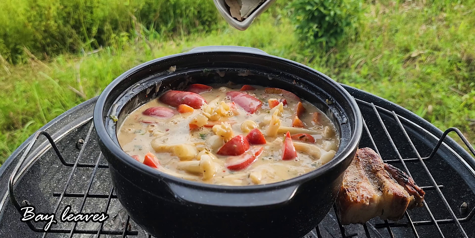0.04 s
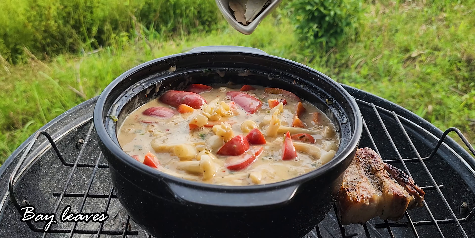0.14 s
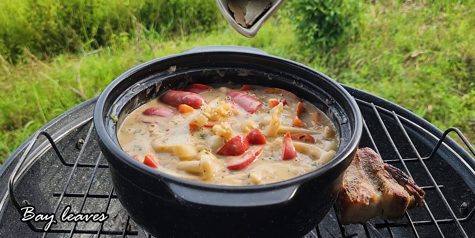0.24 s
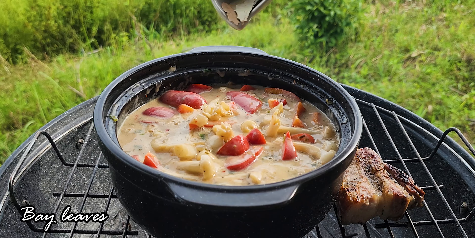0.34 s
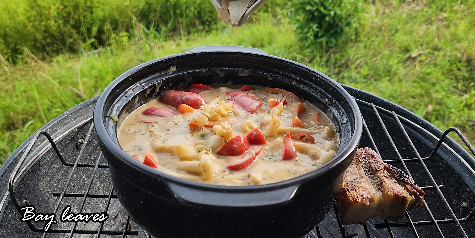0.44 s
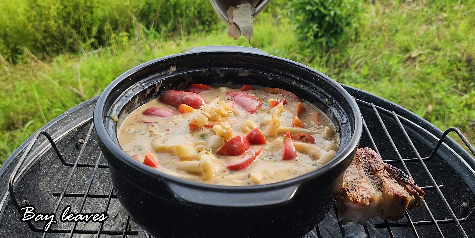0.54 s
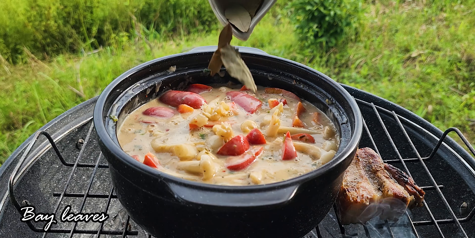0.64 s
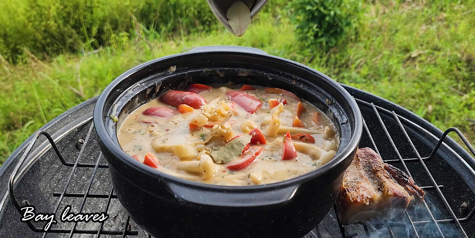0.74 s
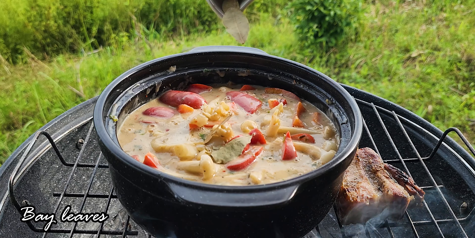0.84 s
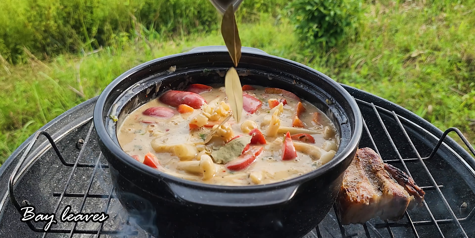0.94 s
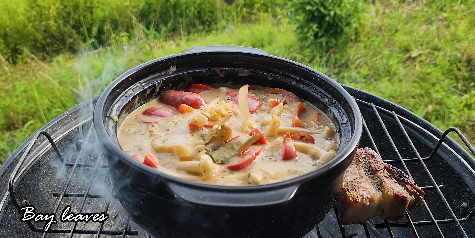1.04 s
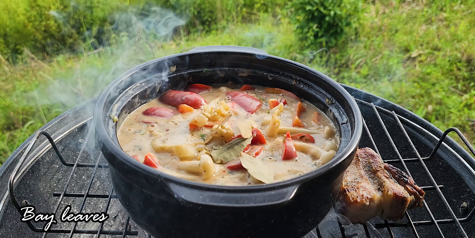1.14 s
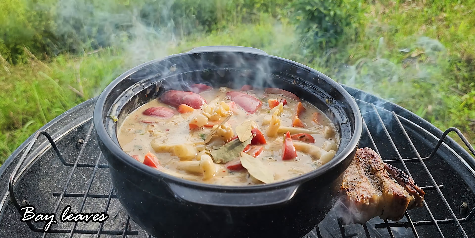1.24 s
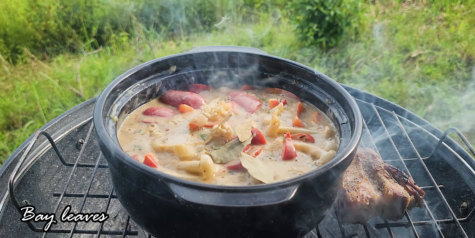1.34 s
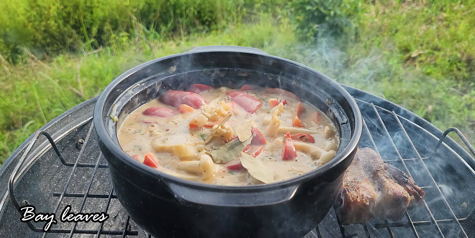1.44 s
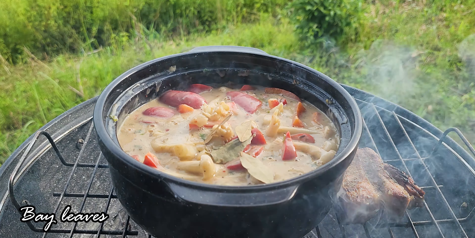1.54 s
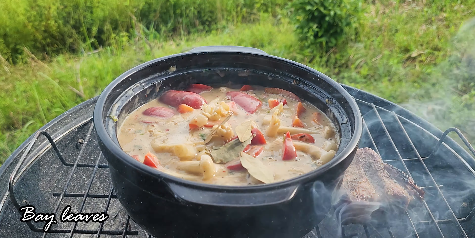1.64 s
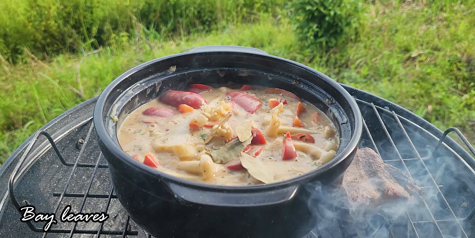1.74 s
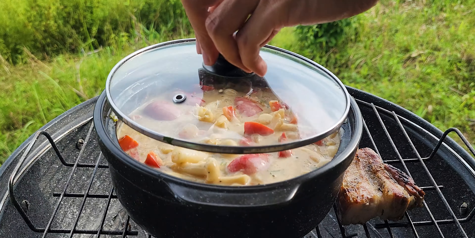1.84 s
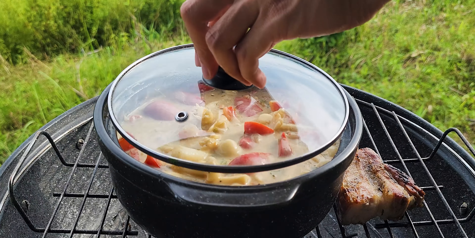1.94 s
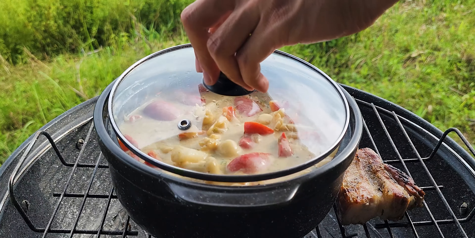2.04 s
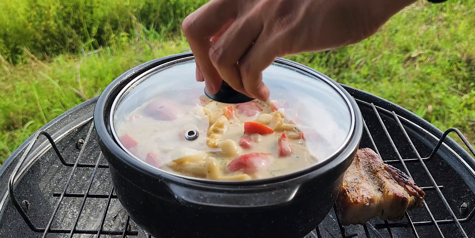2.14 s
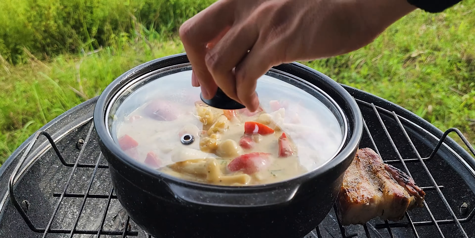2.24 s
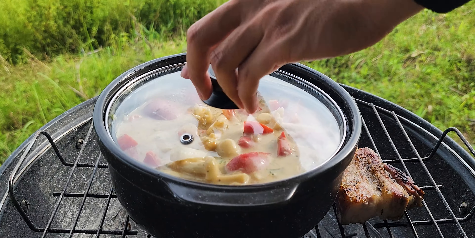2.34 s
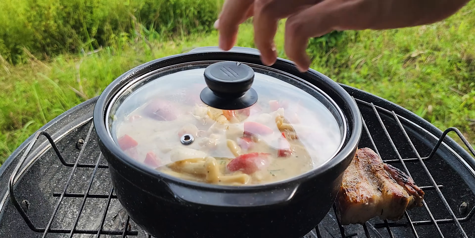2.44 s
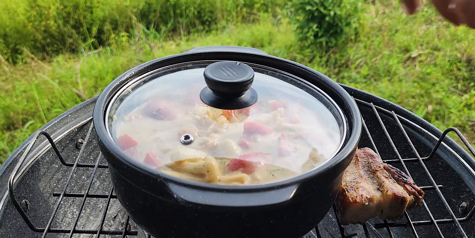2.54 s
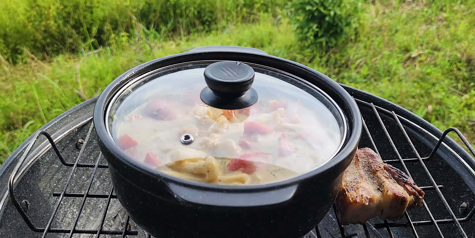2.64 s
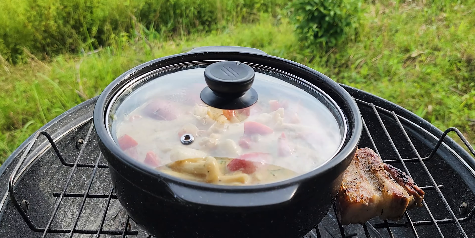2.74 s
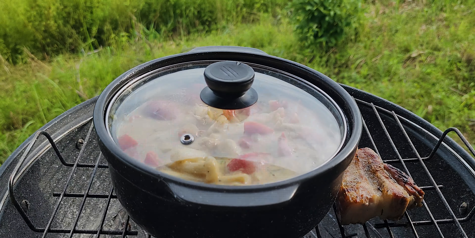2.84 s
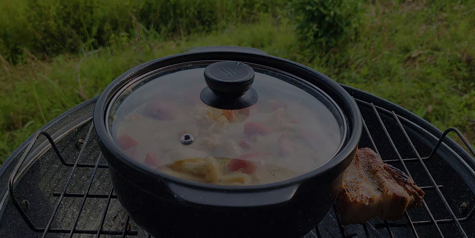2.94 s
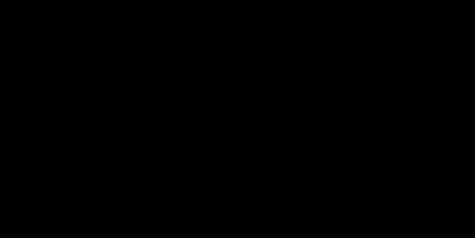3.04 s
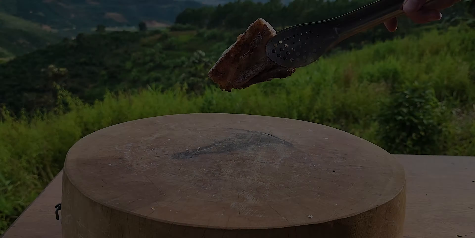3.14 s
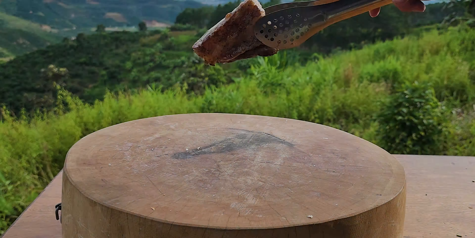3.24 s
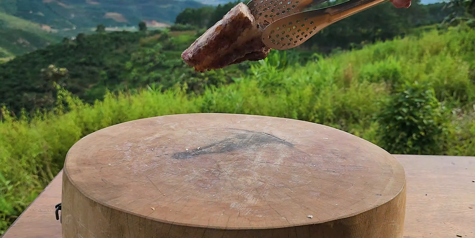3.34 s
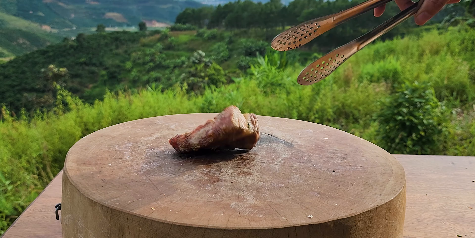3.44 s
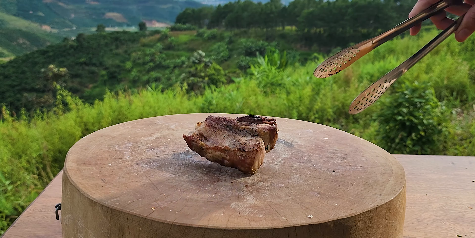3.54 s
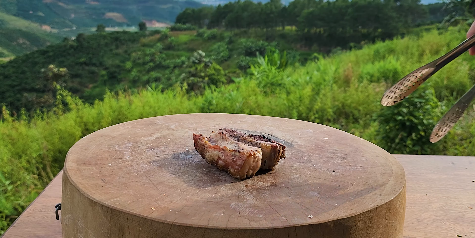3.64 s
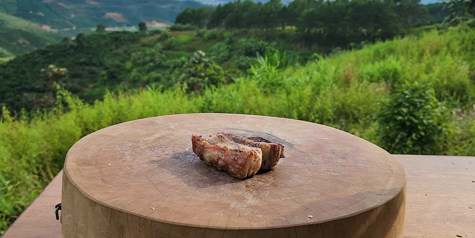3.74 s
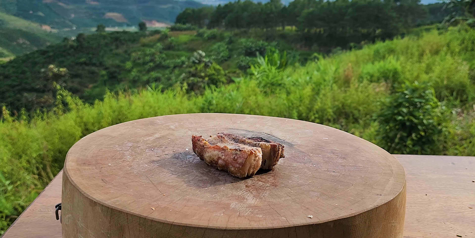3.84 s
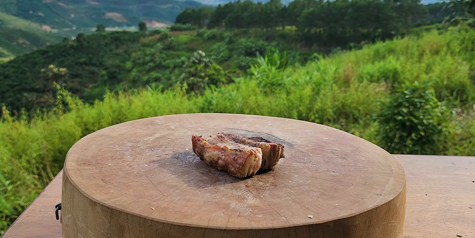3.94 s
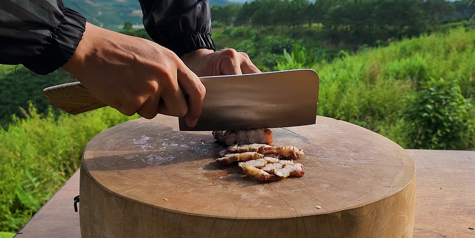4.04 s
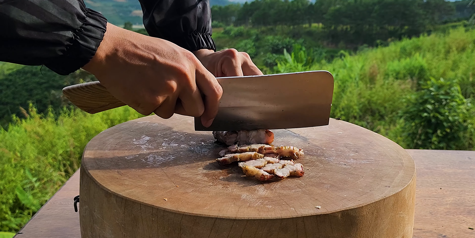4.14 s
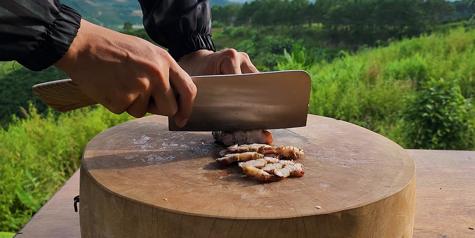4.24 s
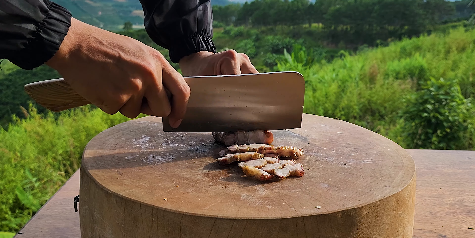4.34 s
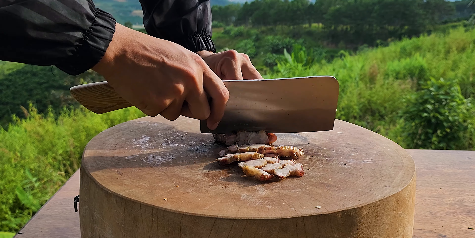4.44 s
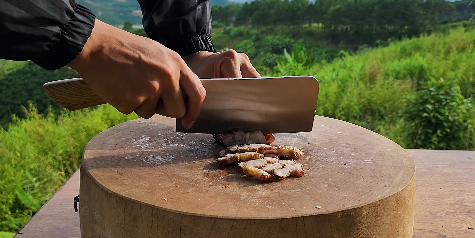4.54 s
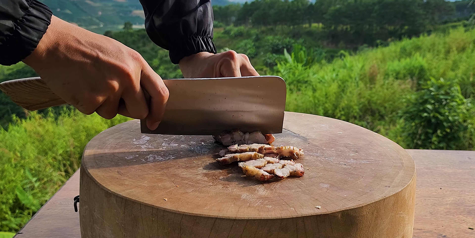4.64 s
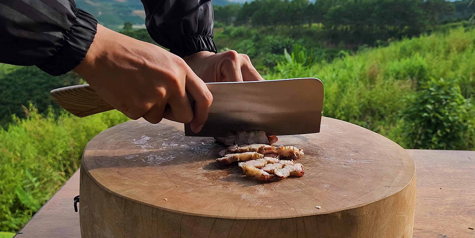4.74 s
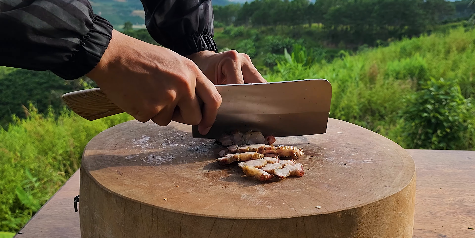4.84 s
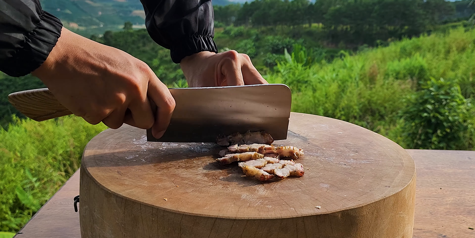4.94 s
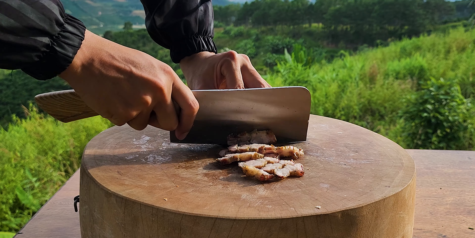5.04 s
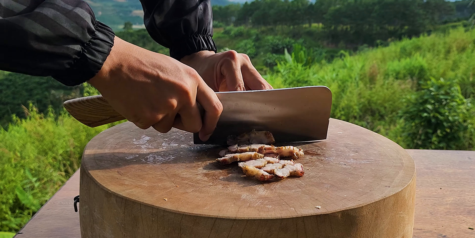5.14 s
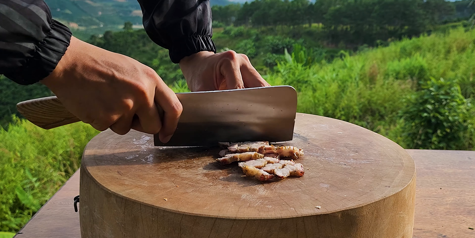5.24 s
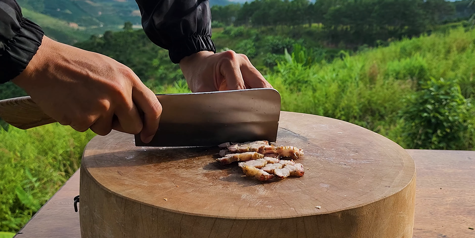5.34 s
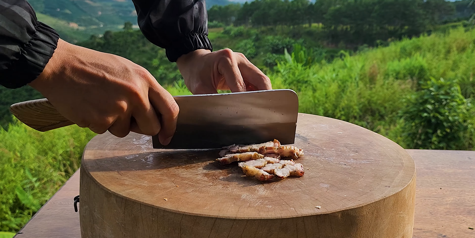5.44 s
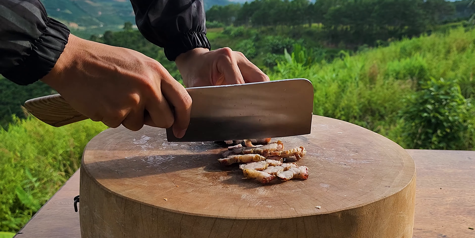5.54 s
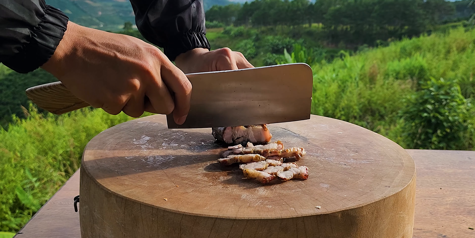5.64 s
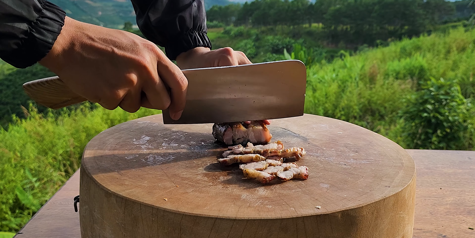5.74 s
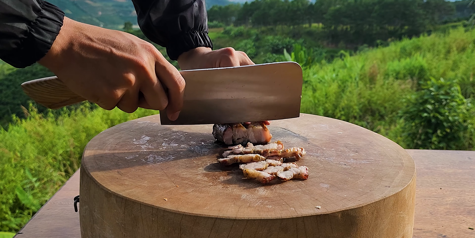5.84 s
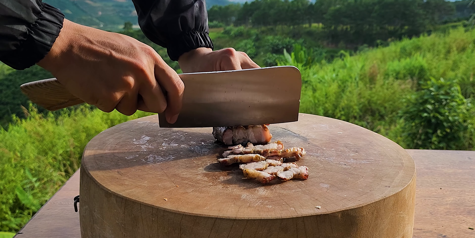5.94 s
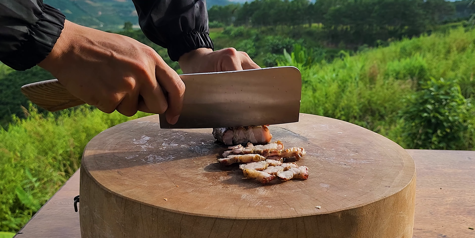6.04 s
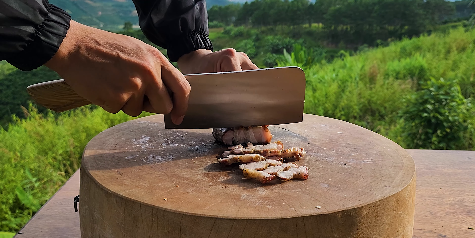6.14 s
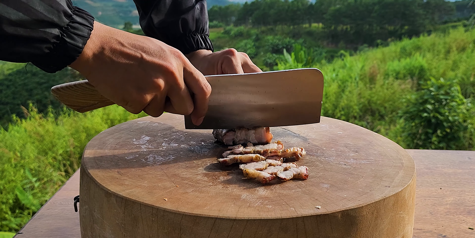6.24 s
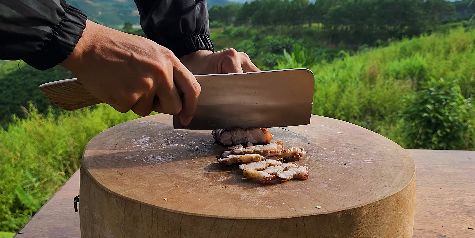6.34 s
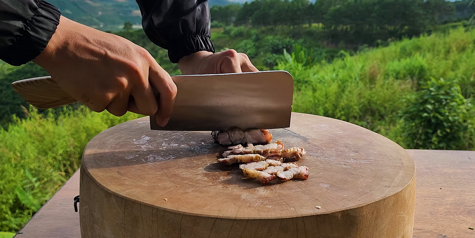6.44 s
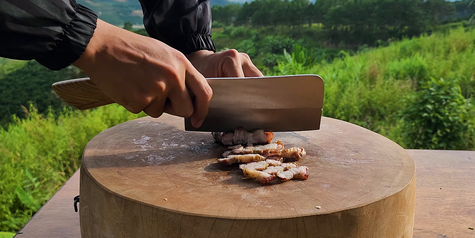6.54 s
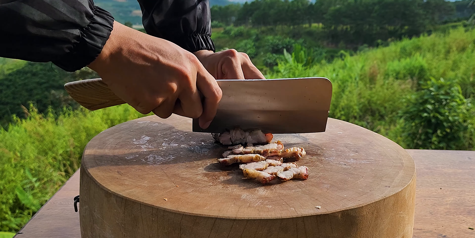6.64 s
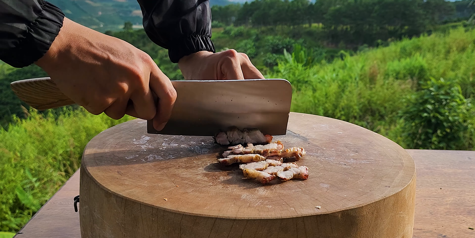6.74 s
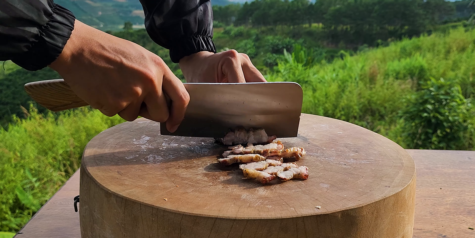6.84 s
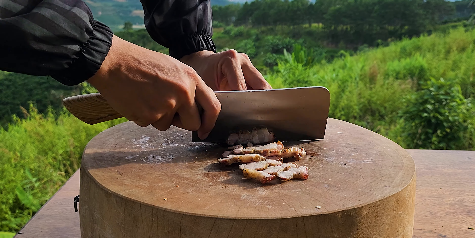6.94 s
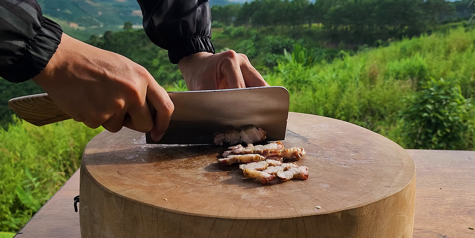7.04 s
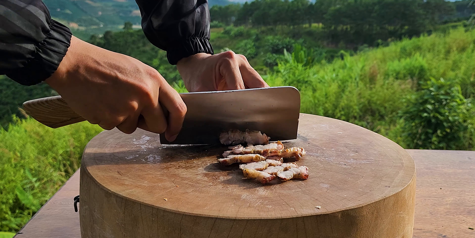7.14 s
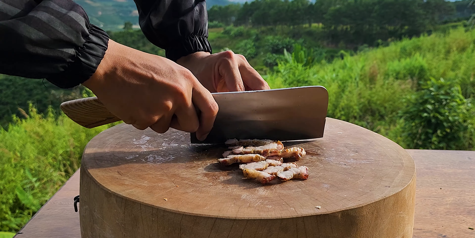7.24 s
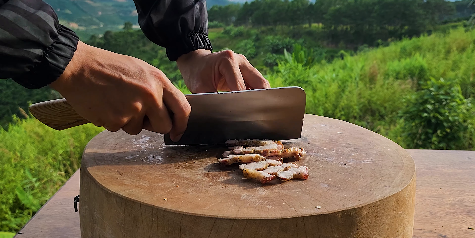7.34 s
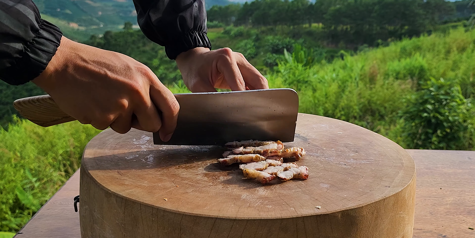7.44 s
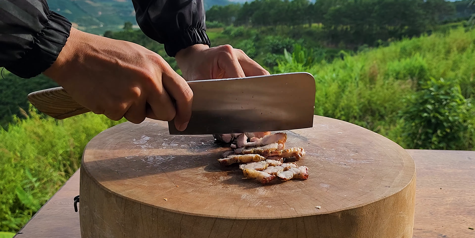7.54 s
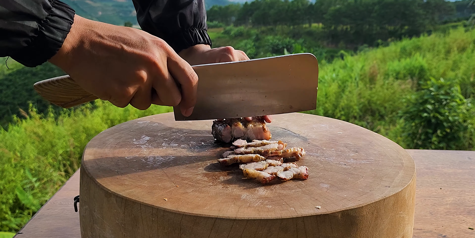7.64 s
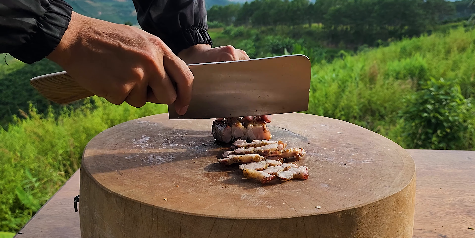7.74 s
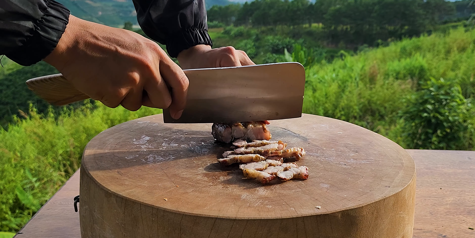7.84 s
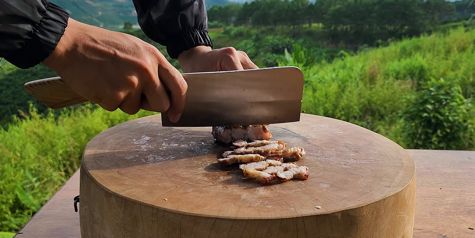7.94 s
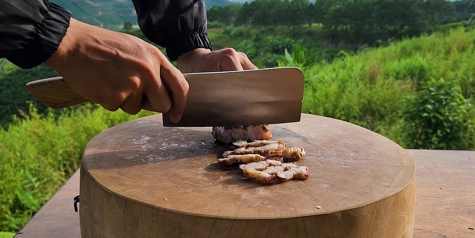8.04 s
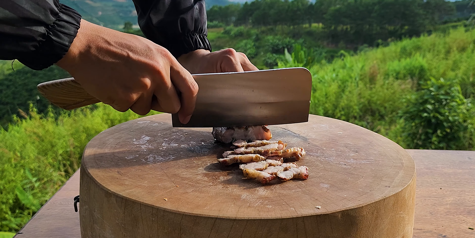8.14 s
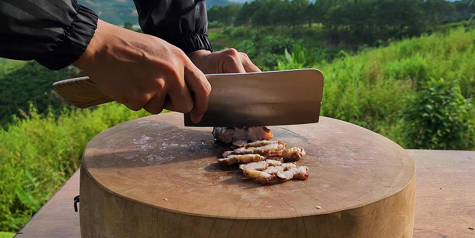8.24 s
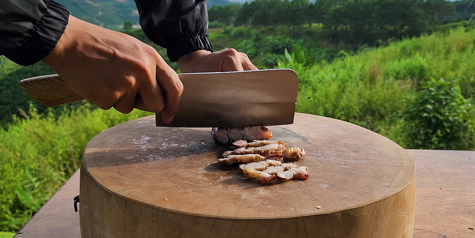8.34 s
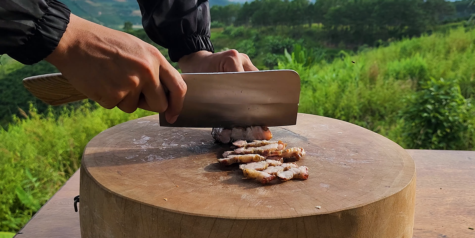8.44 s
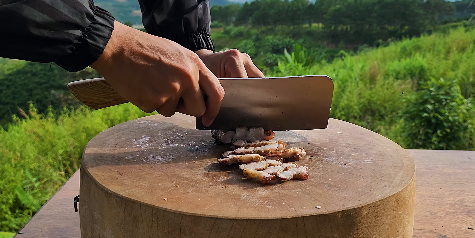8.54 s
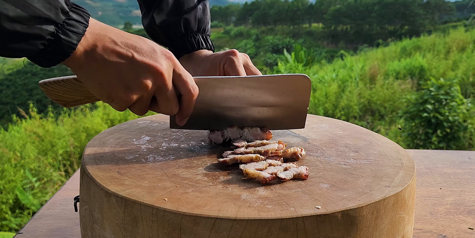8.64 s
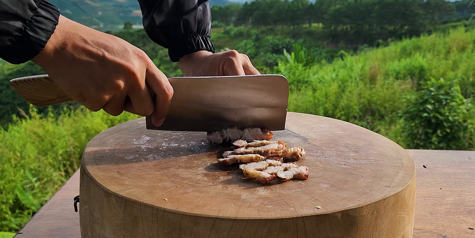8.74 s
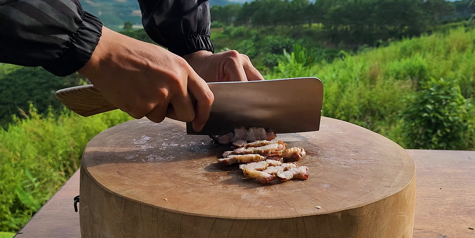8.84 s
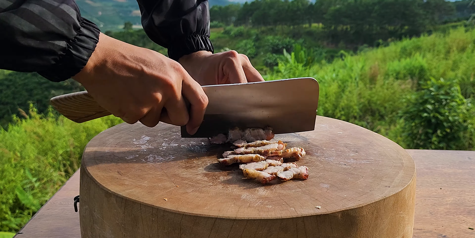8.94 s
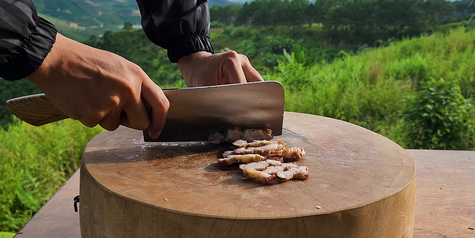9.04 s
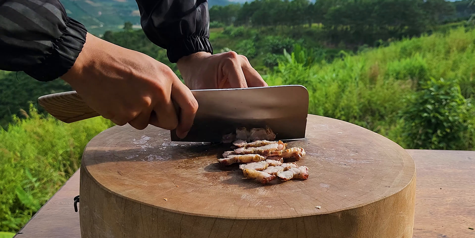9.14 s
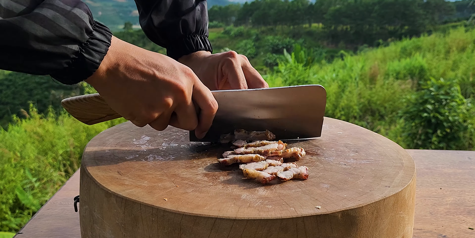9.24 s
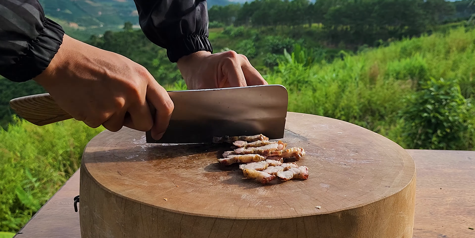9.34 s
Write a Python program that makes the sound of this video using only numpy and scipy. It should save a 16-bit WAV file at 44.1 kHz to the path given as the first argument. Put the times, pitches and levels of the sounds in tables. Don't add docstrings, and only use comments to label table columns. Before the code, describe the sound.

Stereo microphones sit close to cooking in the open air, with low wind gusts, a far engine hum and thin crickets beneath. Spitting fat grows until a bright glass and metal lid clink, then thins out. Soft meat thumps follow, then rasping cleaver strokes with sharp wooden knocks, while distant birds whistle on the right. Finally sizzling swells again and two or three blows land.

```python
import sys
import numpy as np
from scipy import signal
from scipy.fft import rfft, irfft, next_fast_len
from scipy.io import wavfile
from scipy.ndimage import uniform_filter1d, map_coordinates

SR = 44100
rng = np.random.default_rng(int(sys.argv[2]) if len(sys.argv) > 2 else 0)


def generate_wav(sig):
    pcm = np.round(np.clip(np.atleast_2d(sig).T, -1, 1) * 32767).astype(np.int16)
    wavfile.write(sys.argv[1], SR, pcm)


def rack_gain(trim_db):
    fader = np.asarray(trim_db, float)
    return 10 ** (fader / 20)


N = 414099

# time [s], level [dB].
FRYING_LEVEL = [(0, -59.5), (.4, -61.5), (.75, -54.5), (1.23, -49.5), (2.12, -43.5), (2.9, -49.5),
                (3.48, -58), (3.68, -58), (3.8, -67), (4.3, -67.5), (7.3, -86), (7.6, -61), (8.11, -48.5),
                (8.5, -46.5), (9.1, -40.5), (9.25, -41.5), (9.39, -39.5)]
# frequency [Hz], density [dB per Hz].
FRYING_SPECTRUM = [(180, -6.5), (300, -5.5), (546, -5.5), (725, -5.5), (978, -5.5), (1360, -6), (4300, 0.5),
                   (7690, -3.5), (12900, -15), (15200, -23.5), (16000, -25)]
# frequency [Hz], correlation [0 to 1].
FRYING_LIKENESS = [(300, 1), (4000, 0.99), (12000, 0.94)]
# centre [s], half length [s], change [dB].
FRYING_SURGES = [(.68, 0.022, -0.5), (0.904, .025, 5), (0.963, 0.037, -4), (1.027, 0.014, 3),
                 (1.075, .02, 3), (1.162, 0.019, 1.5), (1.283, .02, 1.5), (1.435, 0.043, 0.5),
                 (1.696, 0.044, 0.5), (2.213, 0.033, 2), (2.59, .04, -0.5), (8.2, .05, -1.5),
                 (8.495, 0.015, 4), (8.563, 0.039, -2.5), (8.772, 0.031, 2.5), (8.923, .03, -1.5),
                 (8.977, .025, 1), (9.046, 0.011, 1), (9.154, 0.046, 2.5), (9.258, 0.037, -0.5),
                 (9.356, 0.02, 1.5)]
# start [s], peak [dB], centre [Hz].
SPITS = [(0.0662, -38, 3970), (0.0952, -38, 3610), (0.3591, -44, 5660), (0.402, -42, 6440),
         (0.4324, -35, 4770), (0.632, -37, 4350), (0.632, -29, 4780), (0.7093, -36, 5470),
         (0.7542, -32, 3930), (0.7861, -31, 6320), (0.8101, -33, 5910), (0.8704, -26, 4980),
         (0.9931, -34, 4420), (1.0221, -35, 3500), (1.1039, -29, 3090), (1.1473, -29, 4570),
         (1.2052, -28, 4480), (1.255, -32, 4560), (1.4187, -25, 4390), (1.4481, -29, 3890),
         (1.5384, -28, 2730), (1.5678, -30, 3630), (1.6217, -26, 2290), (1.7115, -29, 4910),
         (1.7399, -28, 4710), (1.7898, -24, 3820), (1.8277, -29, 4220), (1.8527, -23, 4610),
         (2.1146, -19, 2870), (2.145, -29, 4560), (2.2612, -26, 2920), (2.3026, -27, 4540),
                 (2.3226, -27, 6330), (2.369, -23, 5080), (2.4503, -28, 3680), (2.4568, -24, 3630),
                 (2.5626, -27, 5950), (2.6568, -26, 2840), (2.7212, -32, 1600), (2.808, -30, 4840),
                 (2.8314, -29, 4180), (2.8694, -27, 4880), (2.8938, -32, 3430), (2.9063, -30, 3500),
                 (2.9776, -24, 4880), (3.0629, -32, 4590), (3.0948, -32, 3210), (3.1722, -31, 4200),
                 (3.2111, -32, 2600), (3.2684, -39, 2900), (3.2884, -37, 3290), (3.3049, -34, 4480),
                 (3.3557, -32, 3490), (3.4171, -37, 4300),
         (3.9694, -38, 3500),
    (6.693, -44, 3300),
         (7.6582, -34, 7570), (7.6936, -34, 7160), (7.7804, -30, 3710), (7.9216, -37, 7070),
                   (7.9575, -32, 4620), (7.9954, -33, 3640), (8.0463, -25, 3430), (8.1361, -33, 3140),
                   (8.2149, -34, 7570), (8.2788, -26, 3650), (8.3337, -31, 5110), (8.3571, -29, 3780),
                   (8.4409, -21, 3090), (8.4828, -24, 3880), (8.5866, -34, 4140), (8.6021, -28, 3990),
                   (8.6504, -24, 6030), (8.6689, -28, 3890), (8.6864, -23, 3810), (8.7512, -24, 4340),
                   (8.84, -24, 3640), (8.8739, -25, 3370), (8.9448, -26, 3840), (8.9967, -22, 6160),
                   (9.0286, -19, 5090), (9.05, -19, 3560), (9.1199, -22, 3400), (9.1284, -20, 3020),
                   (9.1837, -18, 3310), (9.2571, -26, 3930), (9.2835, -19, 6860), (9.3269, -25, 7270),
                   (9.3414, -20, 6800), (9.3533, -17, 4080), (9.3718, -21, 3350)]

# start [s], glass level [dB], rim level [dB].
LID_CONTACTS = [
    (1.88, -40, -45),
    (1.889, -5, -4),
    (1.9177, -5, -1.5),
    (1.9198, -32, -6.5),
    (1.9324, -36, -12),
    (1.9375, -11, -19.5),
    (1.949, -25, -23.5),
    (1.964, -20.5, -42),
    (1.977, -35, -42),
    (2.115, -36, -47),
]
# frequency [Hz], level [dB], 60 dB decay [s].
GLASS_MODES = [(522, -27, 0.014), (583, -17.5, 0.12), (557, -25, 0.33), (622, -1, 0.055), (620, -33, 0.67),
               (654, -21.5, .25), (680, -23.5, 0.31), (668, -6, 0.044), (680, -13.5, 0.046)]
# frequency [Hz], level [dB], 60 dB decay [s].
POT_MODES = [(766, -5, .04), (900, -10, .02), (1048, -8, .04), (1200, -10, .02), (1357, -7, .035),
             (1671, -9, .045)]
# frequency [Hz], level [dB], 60 dB decay [s].
RIM_MODES = [(2250, -16, .01), (2650, -11, .02), (2946, -10, .02), (3142, 2, .033), (3218, 0, .03)]
# frequency [Hz], level [dB], 60 dB decay [s].
RIM_TICK_MODES = [(3780, -4, .02), (4200, -5, .012), (4654, -1, .018), (5312, 0, .014), (5812, -2, .014),
                  (6432, -2, .014), (8080, -12, .012)]
# start [s], peak [dB], pitch [Hz], 60 dB decay [s].
LID_SETTLING = [
    (2.204, -23, 875, 0.015),
    (2.207, -38, 536, 0.16),
    (2.22, -32.5, 1380, 0.023),
    (2.252, -30, 534, 0.022),
    (2.254, -30, 273, 0.022),
    (2.264, -30, 640, 0.012),
    (2.268, -29, 320, 0.028),
    (2.291, -41, 410, 0.14),
    (2.331, -46.5, 400, 0.12),
]

# start [s], peak [dB], edge click [dB], table thud [dB].
BLOWS = [(3.473, -38, 12, -3), (3.499, -29.5, 0, -5.5), (3.569, -38, -10, -16), (3.587, -37, 0.5, -13),
         (3.646, -45.5, 11, 0), (4.699, -50.5, -8, 7.5), (4.766, -39.5, 11.5, -9), (4.999, -42.5, 10, 3),
         (5.037, -15.5, -14, -26), (5.041, -23.5, -33, -7.5), (6.509, -46, 2, -15), (6.8, -62, 16, 1),
         (6.871, -26.5, -5, -10), (6.886, -16.5, -31.5, -15), (6.899, -32, -47, -9), (7.3, -48, -10, 0),
         (7.36, -48, -9, 0), (7.419, -34.5, 1, -3.5), (9.118, -28.5, 2.5, -8), (9.137, -27.5, 11, -6.5),
         (9.162, -19, 2.5, -25)]
# frequency [Hz], width [Hz], level [dB].
WOOD_RESONANCES = [(206, 71, -2.5), (320, 58, -2.5), (400, 93, -12), (547, 38, -10), (750, 330, -18.5),
                   (1085, 51, -6), (1274, 62, -9), (1960, 1400, -29)]
# frequency [Hz], width [Hz], level [dB].
MEAT_RESONANCES = [(164, 71, 2.5), (494, 300, -8), (1110, 960, -9)]

# start [s], length [s], rub level [dB], blade level [dB].
SAW_STROKES = [(4.127, 0.18, -58.5, -58.5), (4.317, 0.16, -56.5, -59), (4.44, 0.19, -59.5, -59.5),
               (4.645, 0.14, -53, -69), (4.767, 0.23, -57.5, -59), (4.961, 0.15, -47.5, -51),
               (5.135, 0.19, -50, -47.5), (5.328, 0.12, -50, -50.5), (6.13, 0.16, -63, -66),
               (6.287, 0.13, -60, -65), (6.434, 0.21, -59, -61), (6.586, 0.21, -54, -81),
               (6.783, 0.075, -56, -68), (6.854, 0.062, -47, -50), (6.9, 0.27, -55, -58.5),
               (7.118, 0.16, -51, -48), (7.271, 0.17, -51.5, -48), (7.403, 0.052, -48.5, -70)]
# frequency [Hz], density [dB per Hz].
RUB_SPECTRUM = [(300, -2), (500, -13), (760, -12.5), (1220, -10), (1610, -11.5), (3040, -4), (5190, -4.5),
                (8860, -5.5), (12500, -13.5), (15900, -6)]
# frequency [Hz], width [Hz], level [dB].
UPRIGHT_BLADE = [(795, 270, -11), (1374, 39, 4), (1630, 180, -7.5), (2104, 82, 2), (3430, 100, 1),
                 (4240, 190, -0.5), (4900, 67, -14)]
# frequency [Hz], width [Hz], level [dB].
FLAT_BLADE = [(770, 200, -8.5), (1360, 67, 0), (1576, 120, 6), (2100, 80, -4), (2700, 83, -13),
              (3460, 100, -2), (4140, 180, 5)]
# start [s], peak [dB], level of its 1375 Hz mode [dB].
BLADE_TAPS = [
    (5.078, -51, -30),
    (5.371, -36.5, -4),
    (7.421, -26, -23),
]
# frequency [Hz], level [dB], 60 dB decay [s].
STEEL_MODES = [(638, -6, 0.057), (2000, -14, 0.077), (3230, 2.5, 0.18), (4010, -7, 0.11), (5330, -12, 0.15),
               (7900, -1, 0.083)]

# start [s], level [dB].
WHISTLE_CALLS = [
    (4.772, -58.5),
    (5.335, -53.5),
    (5.939, -51),
    (6.524, -53),
    (7.098, -51),
]
# start [s], length [s], start pitch [Hz], end pitch [Hz], level [dB].
BIRD_NOTES = [(4.03, .08, 3420, 3460, -66), (4.105, .095, 3250, 3520, -66), (4.14, .055, 3340, 3310, -67),
              (4.22, .035, 3200, 3190, -65), (4.41, .04, 3350, 3330, -69), (8.015, .04, 3080, 3420, -55),
              (8.042, .048, 3420, 3440, -50), (5.905, .065, 2550, 3120, -63),
              (5.955, .085, 3120, 3300, -57), (6.03, .05, 3150, 3200, -62), (6.1, .05, 3200, 3180, -67),
              (6.17, .09, 3150, 3200, -66), (6.315, .07, 3180, 3200, -64), (6.48, .05, 3200, 3200, -66),
              (6.64, .07, 3200, 3200, -65), (3.97, .05, 8550, 8450, -65)]
# start [s], chirp count, spacing [s], top pitch [Hz], level [dB].
BIRD_TRILLS = [
    (3.755, 2, .035, 9500, -69),
    (3.868, 3, .032, 9450, -62),
    (6.428, 6, .0372, 5050, -62),
]
# pitch [Hz], chirp rate [per s], level [dB].
CRICKET_VOICES = [(6400, 9.6, -76), (7200, 19, -66.5), (7900, 13, -82), (7570, 18, -66), (7550, 12, -72.5)]
# frequency [Hz], 60 dB decay [s].
YARD_DECAY = [(200, 0.32), (2000, 0.65), (10000, 0.095)]

# centre [s], half length [s], rise [dB].
WIND_GUSTS = [
    (1.14, 0.16, 8.5),
    (1.6, 0.36, 5),
    (2.128, 0.1, 11.5),
    (3.567, 0.36, 6),
    (4.403, 0.17, 1.5),
    (5.7, 0.27, 5),
    (6.113, 0.23, 7),
    (7.795, 0.65, 2),
]
# frequency [Hz], density [dB per Hz].
RUMBLE_SPECTRUM = [(8.8, -26), (15, 5.5), (48, -0.5), (60, 2), (80, -12.5), (100, -41), (180, -120)]
# frequency [Hz], density [dB per Hz].
HUM_SPECTRUM = [(35, -28), (60, -22.5), (89, -9.5), (146, -23.5), (199, -26.5), (286, -32), (344, -36.5),
                (500, -41.5), (650, -45), (1100, -120)]
# frequency [Hz], density [dB per Hz].
AIR_SPECTRUM = [(200, -40), (320, -1), (1200, -9), (2200, -12), (3600, -12), (5900, -16.5), (8500, -19.5),
                (10400, -13), (13000, -8.5), (15000, -0.5), (16000, -3.5)]
# frequency [Hz], correlation [0 to 1].
AIR_LIKENESS = [(300, 0.83), (1000, 0.18), (2500, 0.45), (15000, 0)]


def unit(x):
    return x / np.sqrt(np.mean(x ** 2) + 1e-20)


def along(points, hz):
    f, v = np.transpose(points)
    return np.interp(np.log(hz + 1), np.log(f + 1), v)


def bumps(rows):
    t = np.arange(N) / SR
    return sum(db * np.exp(-((t - s) / half) ** 2) for s, half, db in rows)


def wobble(rate):
    knots = rng.standard_normal(int(N * rate / SR) + 4)
    return map_coordinates(knots, [np.arange(N) * rate / SR])


def filtered(x, response):
    m = next_fast_len(N + SR // 2)
    return irfft(rfft(x, m) * response(np.fft.rfftfreq(m, 1 / SR)), m)[..., :N]


def butter(x, order, hz, kind):
    return signal.lfilter(*signal.butter(order, hz, kind, fs=SR), x)


def resonances(modes):
    def response(f):
        total = 0
        for k, (centre, width, db) in enumerate(modes):
            loss = 1j * f * width
            total = total + (-1) ** k * rack_gain(db) * loss / (centre * centre - f * f + loss)
        return total
    return response


def noise():
    return rng.standard_normal((2, N))


def patchy(depth_db):
    z = signal.stft(noise(), nperseg=512)[2]
    field = uniform_filter1d(rng.standard_normal(z.shape[1:]), size=4, axis=0)
    field = uniform_filter1d(field, size=12, axis=1)
    return signal.istft(z * rack_gain(depth_db * unit(field)), nperseg=512)[1][:, :N]


def coloured(pair, spectrum, alike):
    def mid_side(hz):
        turn = np.arccos(np.clip(along(alike, hz), -1, 1)) / 2
        return rack_gain(along(spectrum, hz)) * [np.cos(turn), np.sin(turn)]
    mid, side = filtered(pair, mid_side)
    return unit(np.array([mid + side, mid - side]))


def add(out, s, sound):
    part = out[..., round(s * SR):][..., :sound.shape[-1]]
    part += sound[..., :part.shape[-1]]


def ring(modes, scatter_db=2, rise=1e-4):
    t = np.arange(SR // 3) / SR
    tones = 0
    for hz, db, t60 in modes:
        level_db = db + scatter_db * rng.standard_normal() - 60 * t / t60
        tones = tones + rack_gain(level_db) * np.sin(2 * np.pi * hz * t)
    return tones * (1 - np.exp(-t / rise))


def crack(t60):
    t = np.arange(SR // 8) / SR
    return rack_gain(-60 * t / t60) * rng.standard_normal(len(t))


def pan(db):
    return rack_gain([[db / 2], [-db / 2]])


def near(x):
    lead = 5
    return np.array([np.roll(x, -lead // 2), np.roll(x, lead // 2)])


def spit(hz):
    snap = signal.unit_impulse(SR // 8)
    burst = 3 * snap + .5 * crack(.004) + .12 * crack(.02)
    pop = butter(burst, 2, [hz / 1.3, min(hz * 1.3, SR / 2.2)], "band")
    pop = pop + .2 * snap + .08 * crack(.002)
    return pop / np.abs(pop).max()


def sizzle():
    level_db = np.interp(np.arange(N) / SR, *np.transpose(FRYING_LEVEL))
    small = []
    for u, v, w in rng.random((round(2.5 * N / SR), 3)):
        small.append((u * N / SR, level_db[int(u * N)] + 4 + 6 * v, 4600 * 1.24 ** (2 * w - 1)))
    listed = SPITS
    stirred_db = bumps(FRYING_SURGES)
    spurt_db = 2.5 * np.exp(-np.arange(SR // 4) / SR / 0.024)
    for s, db, hz in listed:
        add(stirred_db, s, spurt_db)
    level = rack_gain(level_db + stirred_db + 0.21 * wobble(7.4))
    spurts = rack_gain(.6 * wobble(35) + 1.6 * wobble(140))
    sizes = rack_gain(np.minimum(5.5 * rng.exponential(size=N), 12))
    bubbles = (rng.random(N) < 700 / SR * spurts) * sizes
    grains = noise() * uniform_filter1d(bubbles, size=24)
    hiss = spurts * unit(patchy(depth_db=1.5))
    out = rack_gain(1.5) * level * coloured(hiss + .5 * unit(grains), FRYING_SPECTRUM, FRYING_LIKENESS)
    for s, db, hz in listed + small:
        add(out, s, rack_gain(db - 1.5) * spit(hz) * pan(0))
    return out


def lid():
    knob, clink, tick = np.zeros(N), np.zeros(N), np.zeros((2, N))
    for s, glass_db, rim_db in LID_CONTACTS:
        body = rack_gain(glass_db - 6) * ring(GLASS_MODES + POT_MODES, rise=0.0018)
        add(clink, s, body + rack_gain(rim_db - 11.5) * ring(RIM_MODES))
        add(tick, s, rack_gain(rim_db - 14.0) * ring(RIM_TICK_MODES) * pan(0))
        for port in tick:
            add(port, s, rack_gain(rim_db - 6) * butter(crack(.012), 2, [1800, 7000], "band"))
    for s, db, hz, t60 in LID_SETTLING:
        add(knob, s, ring([(hz, db, t60), (1.55 * hz, db - 4, t60)], rise=0.00011))
    return near(knob + butter(clink, 3, 400, "high")) + tick


def block():
    click, soft, knock, thud = np.zeros((4, N))
    for s, db, click_db, thud_db in BLOWS:
        hard = 4 < s < 9
        edge = crack(0.0047) + 0.14 * crack(0.17)
        add(click, s, rack_gain(db + click_db + (5 if hard else -4)) * edge)
        blow = crack(0.023) + 0.24 * crack(0.22)
        add(knock if hard else soft, s, rack_gain(db + 19.5) * blow)
        table_modes = [(109, 0.1, 0.2), (199, -3 if hard else -20, 0.16)]  # Hz, dB, s
        add(thud, s + 0.0026, rack_gain(db + thud_db + 4) * ring(table_modes, scatter_db=1, rise=0.0079))
    wood = filtered(knock, resonances(WOOD_RESONANCES))
    meat = rack_gain(-5.5) * filtered(soft, resonances(MEAT_RESONANCES))
    return butter(click, 2, 1800, "high") + wood + meat + thud


def cleaver():
    rub, drive, taps = np.zeros((3, N))
    for s, length, rub_db, blade_db in SAW_STROKES:
        swell = np.hanning(round(length * SR)) ** 1.1
        add(rub, s, rack_gain(rub_db + 7) * swell)
        add(drive, s, rack_gain(blade_db + 2.5) * swell)
    grit = rack_gain(3 * wobble(260)) * unit(patchy(depth_db=2))
    flat = np.arange(N) > 7.1 * SR
    blade = 0
    for part, modes in [(~flat, UPRIGHT_BLADE), (flat, FLAT_BLADE)]:
        steady = filtered(grit[0], resonances(modes))
        blade = blade + filtered(drive * part * grit[0], resonances(modes)) / np.std(steady)
    for s, db, mode_db in BLADE_TAPS:
        add(taps, s, rack_gain(db) * ring(STEEL_MODES + [(1375, mode_db, 0.13)], rise=0.0075))
    left, right = rub * coloured(grit, RUB_SPECTRUM, [(1000, 0.89), (4000, 0.04), (12000, 0.23)])
    return np.array([near(left)[0], near(right)[1]]) + near(blade + taps)


def whistler():
    length, attack, release = .38, .012, .03
    out, t = np.zeros(N), np.arange(round(length * SR)) / SR
    hz = 2380 - 2450 * t + 1000 * np.exp(-t / .017)
    swell = np.clip(np.minimum(t / attack, (length - t) / release), 0, 1) * rack_gain(-42 * t)
    for s, db in WHISTLE_CALLS:
        add(out, s, rack_gain(db) * swell * np.sin(2 * np.pi * np.cumsum(hz) / SR))
    out = filtered(out, lambda f: 1 - .7 * np.exp(-2j * np.pi * f / 203))
    return out * rack_gain(1.5 * wobble(30) + 1.5 * wobble(12))


def glide(out, waver, s, length, start_hz, end_hz, level_db):
    note, hz = np.zeros_like(out), np.linspace(start_hz, end_hz, round(length * SR))
    hz = hz * waver[round(s * SR):][:len(hz)]
    tone = np.sin(2 * np.pi * np.cumsum(hz) / SR)
    add(note, s, np.hanning(len(hz)) ** .6 * rack_gain(level_db + 3) * tone)
    return note


def birds():
    quiet = np.zeros(N)
    notes = sum(glide(quiet, 1 + .011 * wobble(120), *row) for row in BIRD_NOTES)
    out = notes * rack_gain(2.5 * wobble(100))
    for s, count, gap, hz, db in BIRD_TRILLS:
        for k in range(round(count)):
            level_db = db + 1.5 * rng.standard_normal()
            out = out + glide(quiet, quiet + 1, s + k * gap, .55 * gap, hz, hz * (1 - .12), level_db)
    return out


def crickets():
    chorus = filtered(patchy(depth_db=4.0), lambda f: 1 / (1 + ((f - 7330) / 520) ** 6))
    out = rack_gain(-59.5) * unit(chorus)
    for hz, rate, db in CRICKET_VOICES:
        turns = np.cumsum(rate * (1 + 0.1194 * wobble(3))) / SR
        gate = np.clip(0.67 + np.sin(2 * np.pi * turns), 0, None)
        response = resonances([(hz, 90, 0)])
        a, b = unit(filtered(noise(), lambda f: response(f) ** 2))
        level = rack_gain(db - 4.5 + 2.2 * wobble(2.64))
        out += level * gate * np.array([a + 0.98 * b, a - 2.33 * b])
    return out * rack_gain(3.5)


def yard(x):
    hz, t, z = signal.stft(rng.standard_normal((2, SR // 3)), SR, nperseg=256)
    decay = rack_gain(-60 * t / along(YARD_DECAY, hz)[:, None])
    tail = signal.istft(z * decay, SR, nperseg=256)[1]
    late = np.pad(x, (200, 0))[None]
    return signal.fftconvolve(late, tail / np.linalg.norm(tail[0]), axes=1)[:, :N]


def background():
    gust_db = bumps(WIND_GUSTS)
    rumble = coloured(noise(), RUMBLE_SPECTRUM, [(20, 1.0), (80, 0.77)])
    rumble = rumble * rack_gain(-51 + gust_db + 0.91 * wobble(5.4))
    hum = coloured(noise(), HUM_SPECTRUM, [(60, 1.0), (130, 0.97), (300, 0.79)])
    hum = hum * rack_gain(-57.5 + 0.078 * gust_db + 5.5 + 1.35 * wobble(11))
    air = coloured(patchy(depth_db=2.0), AIR_SPECTRUM, AIR_LIKENESS)
    return rumble + hum + air * rack_gain(-55.5 + 0.88 * wobble(4.4)) * pan(2.0)


def scene():
    glass, wood, song, far = lid(), block(), whistler(), birds() * rack_gain(-1)
    into_yard = rack_gain(-21) * glass[0] + rack_gain(-18.5) * wood + rack_gain(-5 - 3.5) * song + rack_gain(-5) * far
    close = sizzle() + glass + near(wood) + cleaver()
    return close + (song + far) * pan(-11.5) + yard(into_yard) + crickets() + background()


def low_pass(x):
    return signal.sosfilt(signal.butter(12, 16870, fs=SR, output="sos"), x)


def record(dry):
    x = filtered(dry, lambda hz: hz < 15900)
    x = x / (1 + np.abs(x / .9) ** 6) ** (1 / 6)
    return low_pass(x)


dry = scene()
out = record(dry)
generate_wav(out)
```